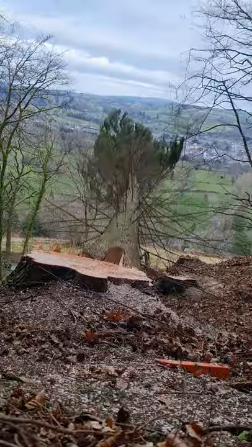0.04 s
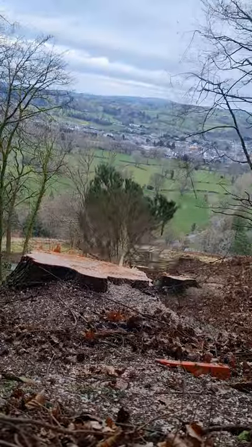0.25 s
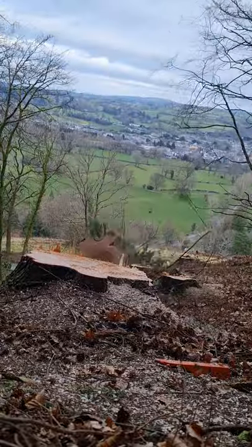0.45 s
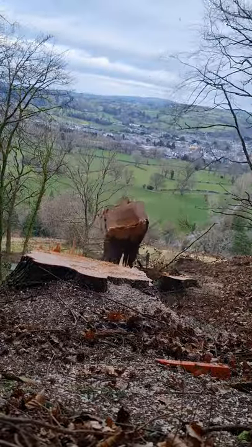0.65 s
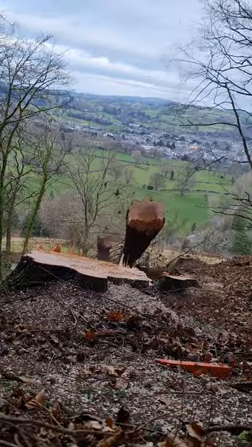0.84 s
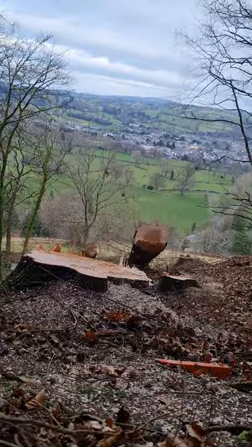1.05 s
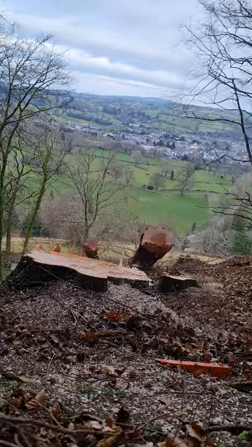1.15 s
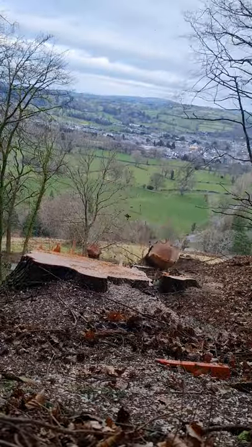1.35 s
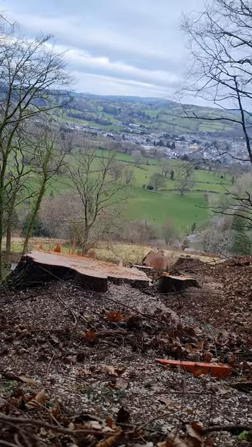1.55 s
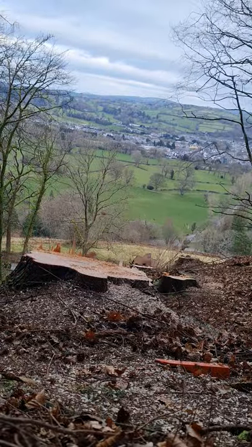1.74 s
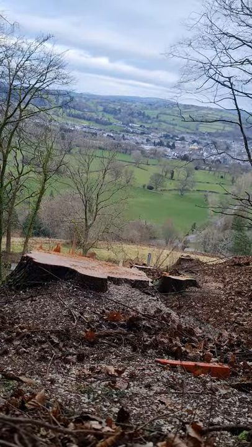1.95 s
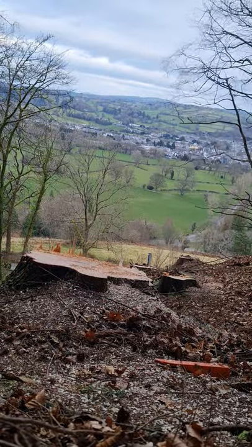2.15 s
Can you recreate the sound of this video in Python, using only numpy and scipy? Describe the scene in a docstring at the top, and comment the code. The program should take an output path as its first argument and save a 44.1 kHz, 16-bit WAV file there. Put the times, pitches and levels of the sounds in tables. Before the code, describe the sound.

A felled tree crashes onto a wooded slope: swishing needles and sharp snaps build quickly, the trunk lands with a heavy resonant thud and rumble, then twigs tick and settle. Close outdoor stereo, treble mostly left.

```python
"""Felled conifer on a hillside

A felled conifer crashes down a wooded slope. Blows ring the trunk's lengthwise modes and dull sine
thumps sound in the soil. Bursts of torn fibre make the snaps; fine grains and blurred noise make the
swishing crown, the drag and the rumble. Random ticks are twigs breaking, and short swells are boughs.
Woodland scatter follows snaps and trunk; the treble reaches mostly the left microphone.
"""
import sys
import numpy as np
from scipy import signal
from scipy.fft import rfft, irfft
from scipy.io import wavfile

SR = 44100
rng = np.random.default_rng(int(sys.argv[2]) if len(sys.argv) > 2 else 0)


def unload_wav(signal):
    """Save mono or channel-first audio to the path in sys.argv[1] as 16-bit WAV at rate SR, clipped to [-1, 1]."""
    wavfile.write(
        sys.argv[1],
        SR,
        np.round(np.clip(np.atleast_2d(signal).T, -1, 1) * 32767).astype(np.int16),
    )


N = 97020  # length in samples, 2.2 s
T = np.arange(N) / SR
HZ = np.maximum(np.arange(N + 1) * SR / (2 * N), 1)  # bins of the zero-padded spectrum


# Blows on the trunk: start_s [s], level_db [dB, relative], contact_hz [Hz, brightness of the contact]
BLOWS = [(0.468, -15, 170), (.483, -22, 170), (0.5571, 4, 670), (0.599, -4, 250), (0.621, -6, 156),
         (0.653, -9.5, 400), (0.793, -13.5, 300), (1.254, -31, 170), (1.398, -44, 250)]
# Lengthwise modes of the trunk: pitch_hz [Hz], level_db [dB, relative], t60_s [s]
TRUNK_MODES = [(74.4, -14.5, 0.38), (142.7, -26.5, 0.82), (225, -15, 0.43), (296.3, -12, 0.2),
               (362.3, -12, 0.15), (434, -21, 0.17), (524, -23, .1), (575, -15, 0.02), (660, -12, 0.02),
               (764, -22, 0.021), (883, -21.5, 0.045), (1025, -23.5, 0.066)]
TRUNK_ECHO_DB, TRUNK_ECHO_LOW_HZ, TRUNK_ECHO_T60_S = -8, 148, 0.91


def trunk():
    """A blow sends a stress wave up and down the stem; soft contacts reach only the low modes."""
    out = np.zeros(N)
    rings = []
    for hz, db, t60 in TRUNK_MODES:
        decay = from_db(db - 60 * T / t60)
        rings.append((hz, decay * np.sin(2 * np.pi * hz * T)))
    for s, db, contact_hz in BLOWS:
        blow = sum(ring / np.sqrt(1 + (hz / contact_hz) ** 4) for hz, ring in rings)
        onset = 1 - np.exp(-T * contact_hz * 2)  # harder contacts start faster
        add(out, s, from_db(db) * blow * onset)
    high_pass = signal.butter(2, TRUNK_ECHO_LOW_HZ, "high", fs=SR, output="sos")
    scattered = signal.sosfilt(high_pass, out)
    echo = woodland(scattered, TRUNK_ECHO_T60_S)[0]  # one echo serves both microphones
    return out + from_db(TRUNK_ECHO_DB) * echo


# Thumps into the soil: start_s [s], level_db [dB, envelope peak], pitch_hz [Hz], swell_s [s, rise to peak]
THUMPS = [(.19, -32, 161, 0.014), (0.217, -26, 61.5, 0.011), (.264, -15.5, 93, 0.0056),
          (.345, -24, 73, 0.011), (0.469, -5, 89.4, .010), (.503, -16, 135.4, 0.014),
          (0.514, -15, 61.5, 0.013), (0.573, -21, 73.5, 0.0047), (0.611, -13, 89.6, 0.015),
          (0.65, -11, 81.3, 0.01), (0.794, -23.5, 51.5, 0.015), (1.09, -24.5, 52.6, 0.015),
          (1.161, -21.5, 42, .018), (1.257, -28, 141, 0.014), (1.273, -31, 64.6, 0.01),
          (1.339, -19, 50, .012), (1.352, -27, 133, 0.0094), (1.434, -26, 62.4, 0.0072),
          (1.583, -32, 61, 0.016), (1.757, -32, 60.5, 0.011), (1.989, -32, 69, 0.015)]
# Groan of heavy wood dragging on soil, over time: time_s [s], level_db [dB]
DRAG_LEVEL = [(0, -44), (.14, -44), (.22, -34), (.42, -37), (.48, -19), (.54, -22.5), (.64, -21),
              (.72, -27.5), (.86, -30.5), (1.0, -42), (1.2, -47), (1.32, -38), (1.5, -43.5), (1.8, -44.5),
              (2.2, -50)]
# Colour of the drag: pitch_hz [Hz], gain_db [dB, relative]
DRAG_COLOUR = [(60, -20), (110, 2), (150, 0), (195, -3), (255, 0), (320, -4), (390, -6.5), (480, -16.5),
               (900, -46.5)]
# Rumble of the ground, over time: time_s [s], level_db [dB]
RUMBLE_LEVEL = [(0, -39.5), (.08, -51), (.25, -27), (.42, -34.5), (.65, -20.5), (.85, -39), (1.02, -44.5),
                (1.35, -34), (1.7, -40.5), (2.2, -43)]
# Colour of the rumble: pitch_hz [Hz], gain_db [dB, relative]
RUMBLE_COLOUR = [(15, -40), (28, -30), (45, 2), (75, 0), (110, -9), (200, -18.5), (500, -70)]


def ground():
    """Soil gives under each thump, and rumbles as the log drags and rolls."""
    out = np.zeros(N)
    for s, db, hz, swell in THUMPS:
        envelope = T / swell * np.exp(1 - T / swell)
        add(out, s, from_db(db) * envelope * np.sin(2 * np.pi * hz * T))
    drag = crackle(DRAG_LEVEL, DRAG_COLOUR, per_s=250, spread_db=3.5, smooth=0.63)
    rumble = crackle(RUMBLE_LEVEL, RUMBLE_COLOUR, per_s=360, spread_db=1, smooth=0.84)
    return out + drag + rumble


# Snapping wood: start_s [s], level_db [dB, relative; brief snaps are weaker still], pitch_hz [Hz],
# sharpness [Q, raised to 1 if lower], length_s [s, rise to peak], bright_db [dB, splinters re body]
SNAPS = [(0.063, -24, 8200, 2, 0.00077, 8), (0.104, -19.5, 3350, 7.7, 0.00082, -17),
         (0.11, -21, 4340, 2.7, 0.0018, 5.5), (.1342, -10.5, 13000, 2, 0.00042, -12),
         (.142, -24, 9000, 1, .0015, 0), (0.161, -20.5, 4120, 4, 0.0013, -4),
         (0.201, -9, 4440, 1.8, 0.00088, -1.5), (0.224, -21.5, 3450, 2, 0.0018, 0),
         (0.2752, -18.5, 3000, 0.85, 0.0015, -6), (0.2782, -13.5, 9200, 0.87, 0.00096, -1),
         (0.31, -15, 3700, 6.3, .001, -12), (.327, -17, 5000, 1.7, 0.00083, -15),
         (0.349, -21.5, 2600, 1.2, 0.00067, -6), (0.355, -21, 10000, 2, 0.0019, -0.5),
         (.4035, -30.5, 1830, 1.8, 0.0012, 13.5), (.441, -19, 3200, 2.5, .001, 0),
         (0.45, -20.5, 3500, 1.4, 0.0017, -1.5), (0.4983, -11.5, 11000, 1.8, .0006, -10),
         (0.504, -23, 12000, 1.8, .001, -1), (0.558, -22, 744, 3.6, 0.0016, -30),
         (.577, -26, 2720, 3.5, 0.00145, -23), (0.5864, -17, 2380, 5.9, 0.0018, -29),
         (0.607, -21, 3470, 2.5, 0.0015, -14), (0.615, -24.5, 1200, 2.6, 0.0046, -11),
         (.657, -20, 3730, 3.5, .0015, -18), (.703, -19, 1500, 2.3, 0.00091, -23),
         (.743, -20, 3200, 4.3, 0.00066, -16), (0.789, -27, 5000, 1, .001, 0),
         (0.8823, -18.5, 2020, 0.88, 0.002, -36), (1.085, -31, 2960, 0.7, 0.0021, -8),
         (1.153, -15.5, 2410, 1.5, 0.0014, -28), (1.156, -26, 1620, 0.41, 0.0057, -15),
         (1.26, -28, 3600, 3.5, .001, -9), (1.312, -29.5, 2930, 1.4, 0.0021, -3),
         (1.317, -25.5, 1240, 0.89, 0.0039, -17), (1.376, -24, 3300, 3, .001, -11),
         (1.388, -16, 9450, 3.3, 0.00057, -25), (1.391, -14.5, 6340, 1.1, .0008, -6),
         (1.5088, -15.5, 3500, 1.8, 0.00077, -12), (1.5822, -9.5, 1870, 2.8, 0.00045, -8.5),
         (1.697, -26.5, 3300, 2.5, 0.00081, -12), (1.866, -37.5, 2430, 5.9, 0.0024, -1),
         (1.883, -30, 6000, 1.7, 0.0018, -13), (1.9666, -30.5, 2300, 5.3, 0.0013, -12),
         (2.058, -34, 7050, 1, 0.0021, -5)]
SPLINTER_HZ = 3500  # splinters sound above this
SNAP_ECHO_DB, SNAP_ECHO_T60_S, SNAP_ECHO_CUT_HZ = -8, 0.089, 10600


def snaps():
    """Each break is a quick run of tearing fibres that rings the branch and sprays bright splinters."""
    out, t = np.zeros(N), T[:SR // 12]
    splinter_filter = signal.butter(2, SPLINTER_HZ, "high", fs=SR, output="sos")
    for s, db, hz, q, length, bright_db in SNAPS:
        fibres = tearing(t / length * np.exp(1 - t / length))
        body_band = [hz / 3, min(hz * 2, SR * .45)]
        body_filter = signal.butter(1, body_band, "band", fs=SR, output="sos")
        body = signal.sosfilt(body_filter, resonate(fibres[0], hz, q))
        splinters = signal.sosfilt(splinter_filter, fibres[1])
        wood = rms_one(body) + from_db(bright_db) * rms_one(splinters)
        add(out, s, from_db(db) * np.sqrt(length / t[-1] / 2) * wood)
    dull = signal.sosfilt(signal.butter(1, SNAP_ECHO_CUT_HZ, fs=SR, output="sos"), out)
    direct = np.array([out, shadowed(out)])
    return direct + from_db(SNAP_ECHO_DB) * woodland(dull, SNAP_ECHO_T60_S)


def tearing(run, count=3):
    """Two bursts of uneven clicks under an envelope, evened out so that they hold all pitches alike."""
    size = (2, len(run))
    uneven = from_db(1.5 * rng.standard_normal(size))  # sizes spread by 1.5 dB
    fibres = rng.choice([-1, 1], size) * uneven * run
    for _ in range(count):
        flat = irfft(np.exp(1j * np.angle(rfft(fibres))), len(run))
        fibres = flat * run ** (1 / count)
    return fibres


# Crown layers over time, before the trims below: time_s [s], level_db [dB, relative]
NEEDLE_LEVEL = [(0, -42), (.04, -41.5), (.09, -43), (.14, -38), (.28, -35.5), (.38, -40), (.51, -38.5),
                (.56, -46), (.68, -46.5), (.84, -55), (1.1, -56), (1.25, -53), (1.45, -51.5), (1.6, -50),
                (1.72, -53), (1.82, -60), (1.95, -55.5), (2.08, -55), (2.2, -64.5)]
TWIG_LEVEL = [(0.0, -43), (0.15, -40), (0.31, -33.5), (0.57, -33.5), (0.72, -32.5), (0.95, -39.5),
              (1.08, -47.5), (1.2, -44), (1.41, -42.5), (1.59, -40), (2.07, -48), (2.2, -51)]
LIMB_LEVEL = [(0.0, -58), (0.14, -44), (0.31, -41), (0.66, -31), (0.74, -34), (0.88, -38), (0.96, -45),
              (1.5, -49), (1.73, -55), (2.06, -56), (2.2, -53)]
# Colours of the crown layers: pitch_hz [Hz], gain_db [dB, relative]
NEEDLE_COLOUR = [(3500, 5), (5500, -4.5), (7700, 3), (8700, -5.5), (10500, -2), (12500, 2.5), (14500, 1.5),
                 (16000, -20.5)]
TWIG_COLOUR = [(900, -9), (1500, -8), (2000, -6.5), (2700, 1.5), (3400, 0.5), (4500, -1.5), (5700, -7),
               (7600, -8.5), (9500, -17)]
LIMB_COLOUR = [(300, -17.5), (480, 1), (700, -1.5), (1000, -2), (1400, -5), (2100, -2), (4000, -33)]
NEEDLE_TRIM_DB, TWIG_TRIM_DB, LIMB_TRIM_DB = 6, -1, 2


def crown():
    """Needles swish, twigs crackle and limbs crunch as the crown is crushed."""
    needles = crackle(NEEDLE_LEVEL, NEEDLE_COLOUR, per_s=1800, spread_db=3.5, smooth=0.93)
    twigs = crackle(TWIG_LEVEL, TWIG_COLOUR, per_s=900, spread_db=1.0, smooth=1.44)
    limbs = crackle(LIMB_LEVEL, LIMB_COLOUR, per_s=400, spread_db=2.0, smooth=0.81)
    return from_db(NEEDLE_TRIM_DB) * needles + from_db(TWIG_TRIM_DB) * twigs + from_db(LIMB_TRIM_DB) * limbs


def crackle(level, spectrum, per_s, spread_db, smooth):
    """Countless tiny fractures of uneven size over the blur of farther ones, following a level curve."""
    sizes = uneven_sizes(spread_db, (3, N)) * rng.choice([-1, 1], (3, N))
    fractures = rms_one(sizes * (rng.random((3, N)) < per_s / SR))
    grains = fractures + smooth * rng.standard_normal((3, N))
    coloured = shape(two_sides(grains), from_db(colour(spectrum)))
    return rms_one(coloured) * from_db(over_time(level))


TWIG_BREAKS_PER_S, TWIG_SPREAD_DB = 260, 3
TWIG_BREAK_DB = -6  # re the twig level curve
TWIG_Q, TWIG_LOW_HZ, TWIG_HIGH_HZ = 5.6, 1500, 5000


def twig_breaks(count=14):
    """Thin twigs give way at random, each a short tick at one of several pitches."""
    sizes = uneven_sizes(TWIG_SPREAD_DB, N) * (rng.random(N) < TWIG_BREAKS_PER_S / SR)
    clicks = sizes * rng.choice([-1, 1], (3, N))
    dealt = rng.integers(0, count, N)  # which pitch each click gets
    ticks = 0
    for k, hz in enumerate(np.geomspace(TWIG_LOW_HZ, TWIG_HIGH_HZ, count)):
        ticks = ticks + resonate(clicks * (dealt == k) + 1e-18, hz, TWIG_Q) / np.sqrt(hz)
    return rms_one(two_sides(ticks)) * from_db(TWIG_BREAK_DB + over_time(TWIG_LEVEL))


# Foliage brushing the ground: middle_s [s], level_db [dB, at the middle], pitch_hz [Hz], half_length_s [s]
SWISHES = [(1.168, -42.5, 12000, .012), (1.605, -43, 13000, 0.032), (1.742, -43, 4860, 0.033)]


def swishes():
    """Boughs spring back and sweep over the leaf litter in short grainy swells."""
    out = 0
    for s, db, hz, half in SWISHES:
        grains = rng.standard_normal((2, N)) * from_db(1.5 * rng.standard_normal((2, N)))
        brushed = resonate(resonate(grains, hz, q=1.1), hz, q=1)
        swell = np.exp(-((T - s) / half) ** 2 / 2)
        out = out + from_db(db) * swell * rms_one(brushed)
    return out


def woodland(x, t60):
    """Diffuse scatter from ground and stems, different on each side."""
    onset = 1 - np.exp(-T / 0.0023)
    tail = rng.standard_normal((2, N)) * from_db(-60 * T / t60) * onset
    tail = tail / np.sqrt(np.sum(tail ** 2) / 2)
    return signal.fftconvolve(x[None], tail, axes=1)[:, :N]


# Likeness of the two microphones: pitch_hz [Hz], correlation [0 to 1]
LIKENESS = [(100, 0.91), (300, 1), (600, 0.62), (1200, 0.18), (2500, 0.13), (6000, 0.11)]


def two_sides(three):
    """Two private versions and one shared one make a pair alike in the bass, mostly apart in the treble."""
    alike = np.clip(colour(LIKENESS), 0, 1)
    return shape(three[:2], np.sqrt(1 - alike)) + shape(three[2], np.sqrt(alike))


DETOUR_S, DETOUR_HZ = 0.00018, 6000  # fade time of the detours; pitch where they take half effect


def shadowed(x):
    """On the far side the treble arrives by several short detours, which turn its phase only."""
    paths = rfft(rng.standard_normal(N) * np.exp(-T / DETOUR_S), 2 * N)
    turn = np.unwrap(np.angle(paths))
    unlike = 1 - np.clip(colour(LIKENESS), 0, 1)
    return shape(x, np.exp(1j * (turn - turn[0]) * unlike * HZ / (HZ + DETOUR_HZ)))


def from_db(db):
    """Decibels to gain."""
    return 10 ** (np.asarray(db) / 20)


def rms_one(x):
    """Scale to unit power."""
    return x / np.sqrt(np.mean(x ** 2) + 1e-20)


def uneven_sizes(spread_db, size):
    """Random gains: many small, few large, capped at four spreads."""
    return from_db(spread_db * np.minimum(rng.exponential(1, size), 4))


def over_time(points):
    """A level table in dB, read at every sample."""
    return np.interp(T, *np.transpose(points))


def colour(points):
    """A table over log frequency, read at every bin."""
    hz, value = np.transpose(points)
    return np.interp(np.log(HZ), np.log(hz), value)


def shape(x, gain):
    """Filter with a gain for every bin."""
    return irfft(rfft(x, 2 * N) * gain)[..., :N]


def add(out, s, x):
    """Mix a sound in at a time in seconds."""
    i = int(s * SR)
    out[i:i + len(x)] += x[:N - i]


def resonate(x, hz, q):
    """One broad resonance."""
    b, a = signal.iirpeak(min(hz, SR / 3), max(q, 1), fs=SR)
    return signal.lfilter(b, a, x)


# Lean towards the left microphone: pitch_hz [Hz], left_minus_right_db [dB]
LEAN = [(60, 0.3), (130, -2), (300, -2), (600, 0), (1300, 3), (2800, 7.5), (5500, 10), (9500, 17),
        (14000, 21)]
RIGHT_LAG_S = .00005


def scene():
    """The whole fall, leaning ever more to the left towards the treble."""
    left = from_db(colour(LEAN))
    right = np.exp(-2j * np.pi * HZ * RIGHT_LAG_S)  # a pure delay
    sides = np.array([left, right]) * 2 / (1 + left)
    return shape(crown() + twig_breaks() + swishes() + snaps() + trunk() + ground(), sides)


LOW_CUT_HZ, HIGH_CUT_HZ = 24, 15850


def record(dry):
    """The deepest bass is lost, the highest peaks are rounded and the top is cut steeply."""
    thinned = shape(dry, 1 / np.sqrt(1 + (LOW_CUT_HZ / HZ) ** 8))
    held = thinned / (1 + thinned ** 8) ** (1 / 8)
    return shape(held, 1 / np.sqrt(1 + (HZ / HIGH_CUT_HZ) ** 400))


dry = scene()
out = record(dry)
unload_wav(out)
```